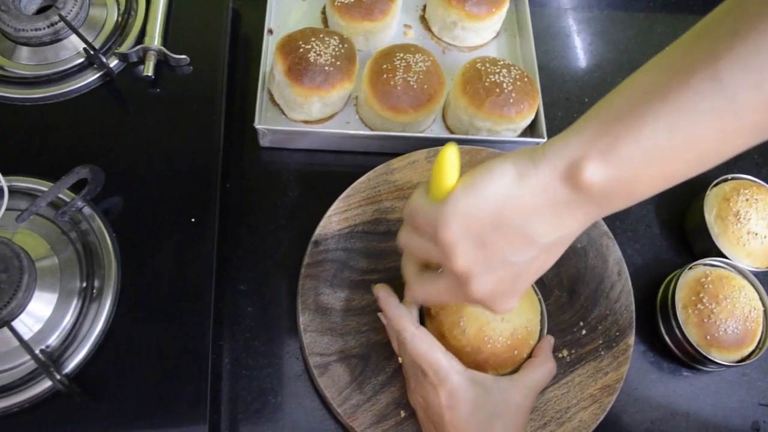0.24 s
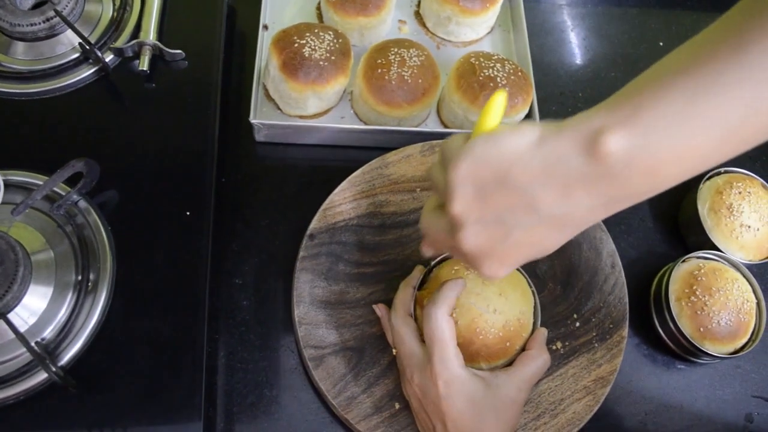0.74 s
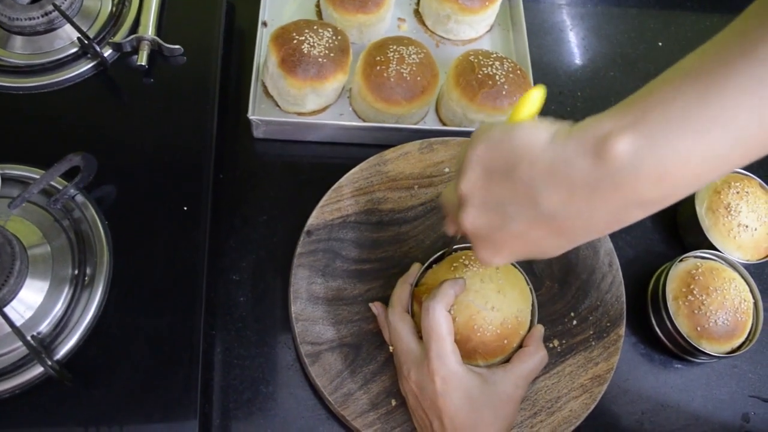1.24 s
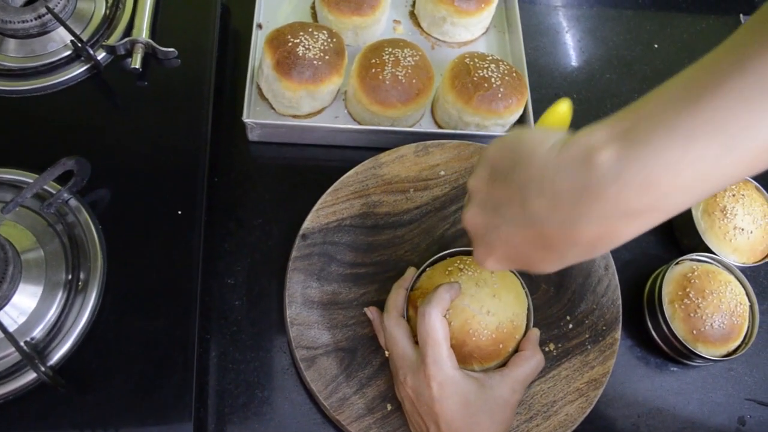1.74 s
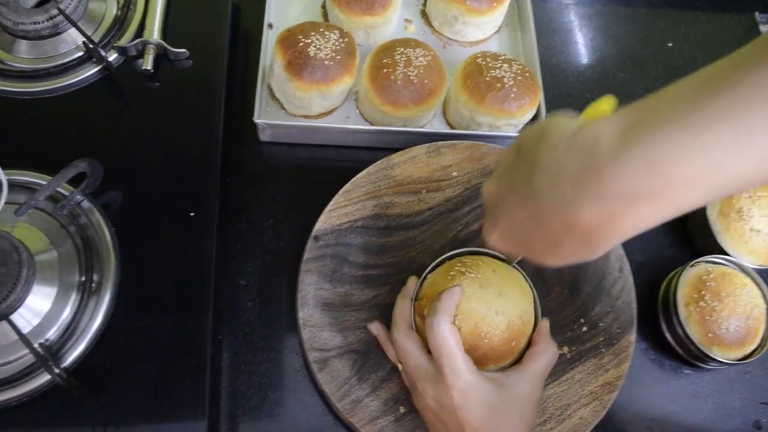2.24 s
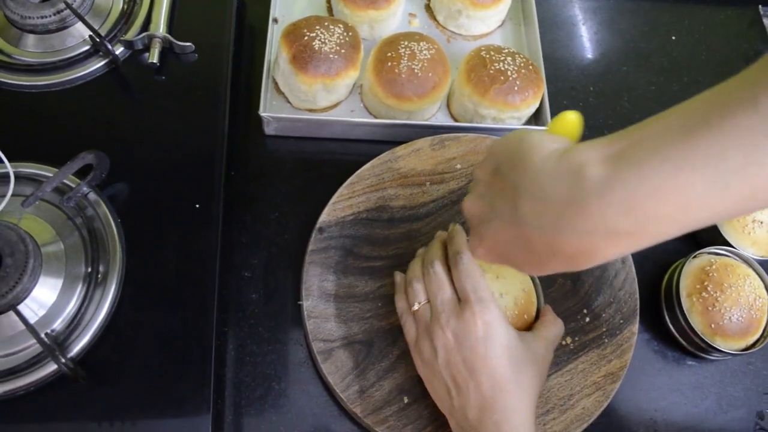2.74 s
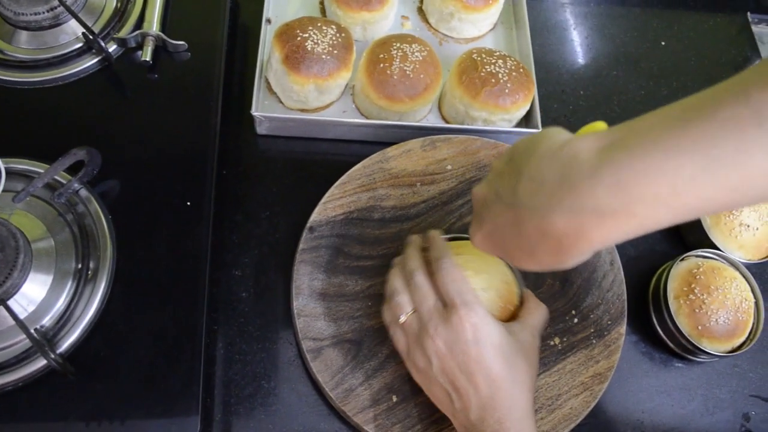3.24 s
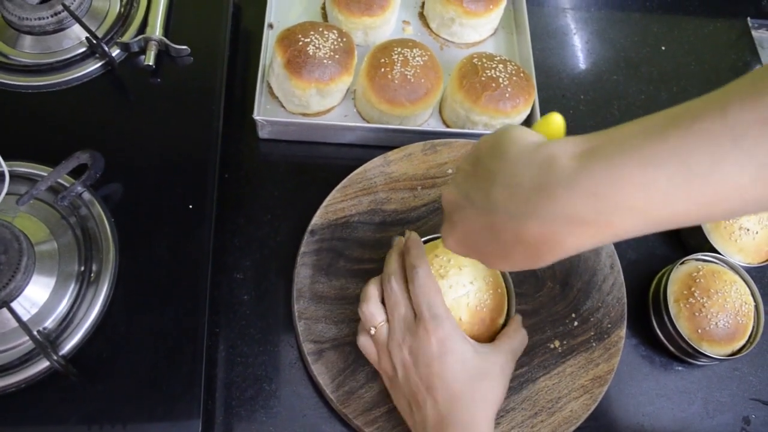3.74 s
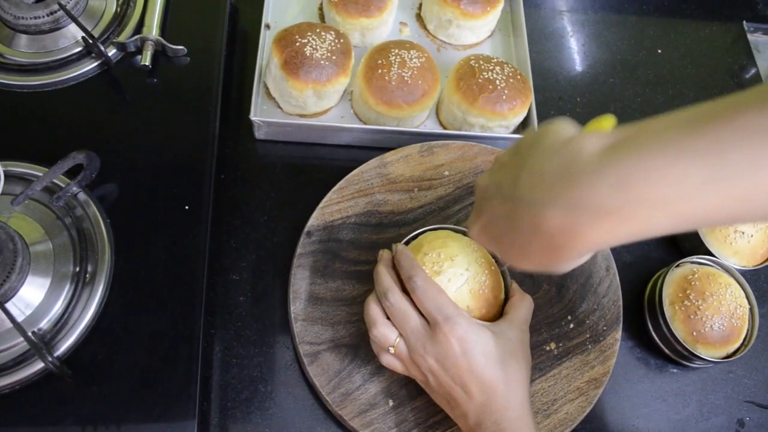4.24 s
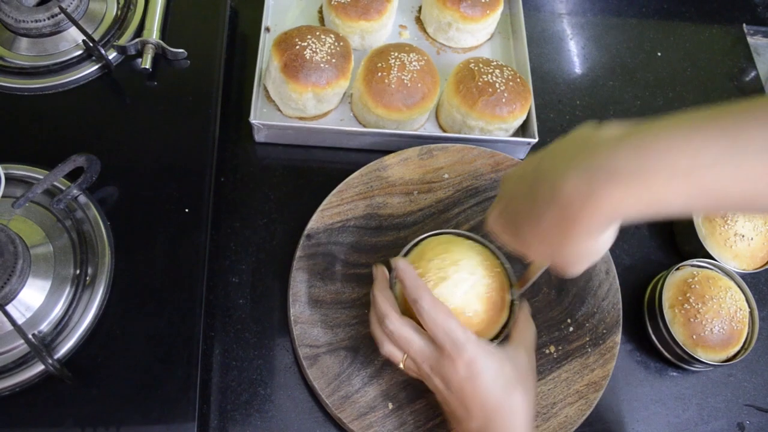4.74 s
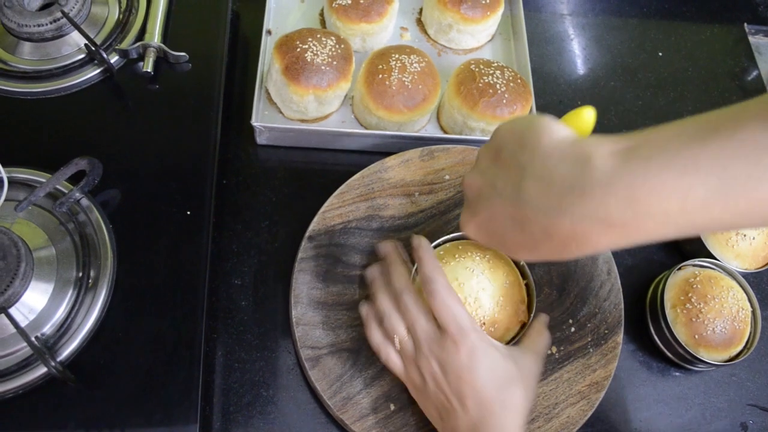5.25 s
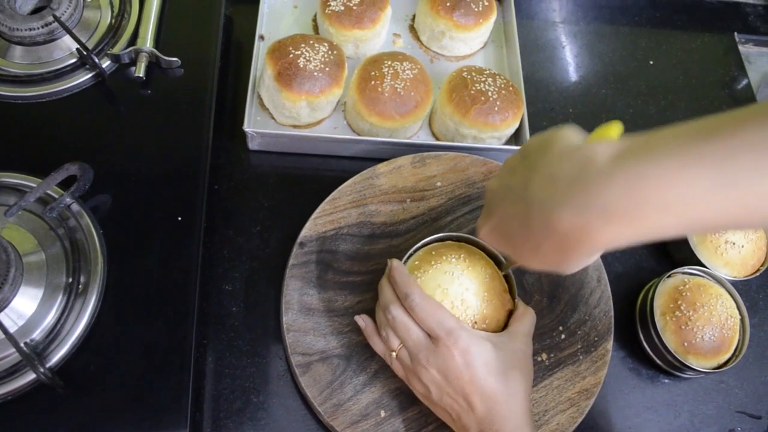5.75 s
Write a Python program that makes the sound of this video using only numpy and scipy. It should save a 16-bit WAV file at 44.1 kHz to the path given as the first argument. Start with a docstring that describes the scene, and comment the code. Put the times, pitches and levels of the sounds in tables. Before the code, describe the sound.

Short dry blade rasps and crust hisses lead into hollow tinny knocks, each with a sharp click, a damped ring and a brief rattle. They come in uneven up-and-down strokes, with gaps around 2.5 to 3.1 and 4.9 to 5.5 seconds. Close microphone, small hard room, low counter thuds under some hits, quiet street rumble.

```python
"""A knife is worked up and down round a bun in a small steel tin on a wooden board, in a hard kitchen.
Its tip knocks on the bottom: short pushes ring the modes of tin and board, and a rattle follows.
Its blade drags the tin, hisses on the crust and sings on the rim: uneven noise, filtered or on a carrier.
A noise tail answers as the room and low booms swell with some knocks. Underneath lie distant street
noise, a wavering low hum and one thin whistle."""
import sys
import numpy as np
from scipy import signal
from scipy.fft import rfft, irfft, next_fast_len
from scipy.io import wavfile
from scipy.ndimage import map_coordinates

SR = 44100
rng = np.random.default_rng(int(sys.argv[2]) if len(sys.argv) > 2 else 0)


def store_wav(level_fs):
    """Save 16-bit WAV to argv[1]."""
    pcm = np.round(np.clip(np.atleast_2d(level_fs), -1, 1) * 32767)
    wavfile.write(sys.argv[1], SR, pcm.T.astype(np.int16))


def boost_factor(decibels):
    """Convert a level in decibels to a linear amplitude factor."""
    exponent = np.asarray(decibels, float) / 20
    return 10 ** exponent


N = 264159  # length in samples


def unit(x):
    """Scaled to rms 1."""
    return x / np.sqrt(np.mean(x ** 2) + 1e-20)


def along(points, hz):
    """Reads (Hz, value) points on a log frequency axis."""
    f, value = np.transpose(points)
    return np.interp(np.log(hz + 1), np.log(f + 1), value)


def over_time(points):
    """Reads (s, value) points at every sample."""
    s, value = np.transpose(points)
    return np.interp(np.arange(N) / SR, s, value)


def wobble(rate):
    """A smooth random curve, rate knots a second."""
    knots = rng.standard_normal(int(N * rate / SR) + 4)
    return map_coordinates(knots, [np.arange(N) * rate / SR])


def filtered(x, response):
    """x times a complex response of frequency."""
    n = x.shape[-1]
    m = next_fast_len(n + SR // 4)
    return irfft(rfft(x, m) * response(np.fft.rfftfreq(m, 1 / SR)), m)[..., :n]


def modes(table):
    """Causal response of a set of resonances, each (Hz, width Hz, dB)."""
    return lambda f: sum(boost_factor(db) * 1j * f * w / (c * c - f * f + 1j * f * w) for c, w, db in table)


def grit(rate, depth_db):
    """Stick-slip force: noise that comes in uneven catches."""
    return unit(rng.standard_normal(N) * boost_factor(depth_db * wobble(rate)))


def tin(force, table, reach=1.2):
    """A force rings some modes; so small a body radiates no bass, and the bun damps all above the modes."""
    top = reach * table[-1][0]

    def response(f):
        bass_cut = (1j * f / (380 + 1j * f)) ** 4
        treble_cut = 1 / (1 + 1.1j * f / top - (f / top) ** 2) ** 5
        return modes(table)(f) * bass_cut * treble_cut
    return filtered(force, response)


# Knocks of the tip. Each row: time in seconds, peak of the lowest modes in dB, then against that peak
# the upper modes in dB, the top modes in dB and the board in dB.
TIP_KNOCKS = [(0.836, -33.5, 7.5, -7.5, -9.5), (1.138, -37.5, 3.5, -8, -10), (1.449, -36.5, 0, -13, -22),
              (1.488, -22, -1, -36, -23), (1.741, -44, 0, -19, -25), (1.786, -29.5, 3, -30, -13),
              (2.052, -53, 14.5, -21, -27), (2.102, -27.5, -2, -37, -18), (2.124, -17.5, -3, -32, -8.5),
              (2.413, -46, 3.5, -41, -23), (2.458, -44, -12, -49, -28), (3.167, -47.5, 6.5, -20, -17),
              (3.2, -33.5, -1, -14.5, -16), (3.228, -9.5, 3.5, -11, -25), (3.517, -15, 1.5, -19.5, -5),
              (4.047, -17.5, 2.5, -28.5, -43), (4.353, -15, 3.5, -23.5, -50), (4.657, -17, 2.5, -20, -22),
              (5.654, -48.5, 15, -24, 1), (5.929, -26, 4.5, -8.5, 3)]
# Modes of the hand-held tin, lowest first. Each row: centre in Hz, width in Hz, strength in dB.
TIN_MODES = [(717.5, 43.4, 26.5), (784, 110, 14), (1050, 30, -18), (1270.3, 81, 24), (1407, 580, 5),
             (1780, 71, -11.5), (2280, 250, 11), (2580, 330, 5.5), (3087, 50, -1)]
LOWEST, UPPER, TOP = TIN_MODES[:2], TIN_MODES[2:6], TIN_MODES[6:]
# Modes of the board under it. Each row: centre in Hz, width in Hz, strength in dB.
BOARD_MODES = [(383, 11, 1), (554.7, 95, 13.5)]
# Contact time scale of the tip in seconds, for the lowest, upper and top modes and the board.
TIP_CONTACT_S = (0.0004, 0.00023, 0.0026, 0.00036)
# The grip shifts between knocks: spread of each mode's pitch (share) and strength (dB).
GRIP_DETUNE, GRIP_DB = 0.012, 2
# Steel click: level offset in dB, dB of click per dB of top modes, 60 dB decay in seconds.
CLICK_DB, CLICK_FOLLOWS, CLICK_T60_S = -31, 0.54, 0.026


def knocks():
    """Soft pushes on tin and board, held a little differently each time, each with a sharp steel click."""
    out, click = np.zeros((2, N + SR))
    t = np.arange(SR // 8) / SR
    for s, db, upper_db, top_db, board_db in TIP_KNOCKS:
        at = round((s - 0.001) * SR)
        span = slice(at, at + len(t))
        click_db = CLICK_DB + CLICK_FOLLOWS * (db + top_db)
        click[span] += boost_factor(click_db - 60 * t / CLICK_T60_S) * rng.standard_normal(len(t))
        parts = [(0, LOWEST), (upper_db, UPPER), (top_db, TOP), (board_db, BOARD_MODES)]
        for (level_db, table), contact_s in zip(parts, TIP_CONTACT_S):
            held = [(hz * (1 + GRIP_DETUNE * rng.normal()), width, strength + GRIP_DB * rng.normal())
                    for hz, width, strength in table]
            u = t / contact_s
            push = u * np.exp(-u * u)
            if table is TOP:  # the top modes rattle through their contact
                ring = tin(push * rng.standard_normal(len(t)), held, reach=0.98)
            else:
                ring = tin(push, held)
            out[span] += boost_factor(db + level_db) * ring / np.abs(ring).max()
    # the click has the colour of the crust hiss, with an added band of steel
    steel = lambda f: boost_factor(along(CRUST_COLOUR, f)) + 0.89 * (f > 3200) * (f < 7000)
    return out[:N] + filtered(click[:N], steel)


# Broad colour of the tin shuddering on the board. Each row: centre in Hz, width in Hz, strength in dB.
SHUDDER_MODES = [(554, 380, 2.5), (941, 600, 8.5), (1440, 240, -0.5), (1706, 270, -3)]
# Levels in dB against the knock's lowest modes; each part's own knock level is added.
SHUDDER_LOW_DB, SHUDDER_TOP_DB = -26.5, -30
# It rises and sags throughout; after the hold a 60 dB decay in T60 is added to the sag.
SHUDDER_RISE_S, SHUDDER_HOLD_S, SHUDDER_T60_S, SHUDDER_SAG_DB_PER_S = 0.0012, 0.065, 0.1, 94.5


def shudder():
    """A rough broad rattle holds for a moment after each knock; the top modes rattle on for longer."""
    low, top = np.zeros((2, N + SR))
    t = np.arange(SR // 3) / SR

    def shape(lasts):
        slow_t = t / lasts  # stretches hold, sag and decay, not the rise
        decay_db = 60 * np.clip(slow_t - SHUDDER_HOLD_S, 0, None) / SHUDDER_T60_S
        return (1 - np.exp(-t / SHUDDER_RISE_S)) * boost_factor(-decay_db - SHUDDER_SAG_DB_PER_S * slow_t)
    for s, db, upper_db, top_db, _ in TIP_KNOCKS:
        at = round(s * SR)
        span = slice(at, at + len(t))
        low[span] += boost_factor(db + SHUDDER_LOW_DB + upper_db) * shape(1)
        top[span] += boost_factor(db + SHUDDER_TOP_DB + top_db) * shape(1.6)
    low_rattle = unit(tin(grit(90, depth_db=3.5), SHUDDER_MODES))
    top_band = lambda f: (f > 1400) / (1 + (f / TIN_MODES[-1][0]) ** 60)
    top_rattle = unit(filtered(grit(90, depth_db=2), top_band))
    return low[:N] * low_rattle + top[:N] * top_rattle


def stroke(start, length, rise, bend):
    """First sample and pressure shape: a downward stroke builds to its knock, a free one bites early."""
    hits = np.array([k[0] for k in TIP_KNOCKS])
    # downward if a knock falls after 0.3 of the stroke and at most 12 ms past its end
    downward = np.any((hits > start + 0.3 * length) & (hits < start + length + 0.012))
    share = rise[0] if downward else rise[1]
    u = np.arange(round(length * SR)) / (length * SR)
    up, down = np.clip([u / share, (1 - u) / (1 - share)], 0, 1)
    return round(start * SR), up ** bend * down ** 0.87


# The blade drags the tin. Each row: start in seconds, length in seconds, lowest modes in dB, upper modes # in
# dB, both before the pressure shape. The row at 3.34 s is no drag: it is the tin still ringing on # after the
# hard knock at 3.228 s.
WALL_DRAGS = [(0.001, 0.2, -67, -54), (0.197, 0.28, -66, -53.5), (0.776, 0.065, -50.5, -50.5),
              (1.091, 0.092, -40.5, -42.5), (1.306, 0.062, -55, -69), (1.398, 0.085, -45, -44.5),
              (1.708, 0.0784, -39.5, -35), (1.793, 0.022, -36, -28), (1.942, 0.097, -59.5, -58),
              (2.026, 0.097, -39, -35.5), (2.403, 0.048, -66, -45.5), (3.154, 0.092, -37.5, -36.5),
              (3.34, 0.178, -49.5, -52), (3.966, 0.13, -50.5, -53.5), (4.255, 0.093, -47, -43.5),
              (4.535, 0.13, -48.5, -50), (5.626, 0.03, -46, -34), (5.74, 0.054, -78, -55),
              (5.859, 0.07, -45, -47)]
DRAG_RISE = (0.9, 0.34)  # share of a stroke spent building up: downward, free


def drags():
    """The blade judders against the wall and shakes the tin's modes, which its pressure damps."""
    low, high = np.zeros((2, N))
    for start, length, low_db, high_db in WALL_DRAGS:
        at, shape = stroke(start, length, DRAG_RISE, bend=1.34)
        low[at:][:len(shape)] += boost_factor(low_db) * shape
        high[at:][:len(shape)] += boost_factor(high_db) * shape
    damped = [(hz, 1.3 * width, db) for hz, width, db in TIN_MODES]
    low_judder = unit(tin(grit(70, depth_db=2.5), damped[:2]))
    high_judder = unit(tin(grit(70, depth_db=4.5), damped[2:4]))
    return low * low_judder + high * high_judder


# The blade slides. Each row: start in seconds, length in seconds, crust hiss in dB, rim in dB, rim pitch
# in Hz; levels before the pressure shape.
BLADE_SLIDES = [(0.001, 0.12, -69.5, -48.5, 2787), (0.07, 0.081, -71, -47, 2720),
                (0.224, 0.22, -72, -49, 2100), (0.285, 0.14, -92, -56, 3260), (0.56, 0.045, -82, -73, 2610),
                (0.742, 0.14, -70, -56, 3050), (0.991, 0.11, -79, -63.5, 3070),
                (1.081, 0.11, -65.5, -46, 2680), (1.309, 0.054, -63.5, -57, 2640),
                (1.407, 0.098, -64.5, -54, 3150), (1.595, 0.069, -60, -59.5, 2716),
                (1.631, 0.08, -65.5, -48, 3160), (1.696, 0.13, -60.5, -48.5, 2430),
                (1.918, 0.12, -67.5, -50.5, 2643), (2.053, 0.098, -64.5, -57.5, 2490),
                (2.258, 0.082, -76.5, -71, 2630), (2.366, 0.092, -80, -70, 3170),
                (3.176, 0.065, -63.5, -59, 2842), (3.332, 0.081, -77, -65, 2690),
                (3.443, 0.14, -68, -61, 2250), (3.915, 0.042, -75, -72.5, 2165),
                (4.274, 0.087, -64.5, -60, 3430), (4.473, 0.032, -74, -68, 2160),
                (4.504, 0.13, -66, -63, 2230), (4.539, 0.046, -74, -56, 2185), (4.6, 0.067, -69, -57, 2140),
                (4.766, 0.1, -71.5, -63.5, 2206), (5.524, 0.068, -60.5, -64.5, 2316),
                (5.621, 0.034, -66.5, -66, 2583), (5.742, 0.11, -67.5, -61.5, 2239),
                (5.873, 0.11, -62.5, -50, 2126)]
# Colour of the crust hiss. Each row: frequency in Hz, relative level in dB per Hz.
CRUST_COLOUR = [(2500, -41), (4000, -1), (5300, -6), (6500, -5), (8000, 1), (10000, 4.5), (11200, 1),
                (12200, -4.5), (14000, -17.5), (15700, -20)]
# The blade's overtone: multiple of the rim pitch, noise corner in Hz, noise level in dB over the hiss
# before it meets the carrier.
BLADE_OVERTONE = (2.02, 300, -6)
SLIDE_RISE = (0.57, 0.27)  # share of a stroke spent building up: downward, free


def slide():
    """Fine crust hiss, a rasp on the rim, and a resonance set by the free blade length in each stroke."""
    hiss = unit(filtered(grit(120, depth_db=2.5), lambda f: boost_factor(along(CRUST_COLOUR, f))))
    narrow = unit(filtered(grit(64, depth_db=2.0), lambda f: 1 / (1 + 1j * f / 180) ** 2))
    catches = grit(120, depth_db=4)
    # rim resonances: (Hz, width Hz, dB)
    rasp = unit(tin(catches, [(1950, 910, 12.0), (2690, 430, 5.5), (3580, 240, -5.0), (4070, 190, -4.0)]))
    multiple, corner_hz, over_db = BLADE_OVERTONE
    broad = unit(filtered(catches, lambda f: 1 / (1 + 1j * f / corner_hz) ** 2))
    out = np.zeros(N)
    for start, length, hiss_db, rim_db, rim_hz in BLADE_SLIDES:
        at, shape = stroke(start, length, SLIDE_RISE, bend=0.8)
        span = slice(at, at + len(shape))
        phase = 2 * np.pi * rim_hz * np.arange(len(shape)) / SR
        # low noise carried on the stroke's pitch and on its overtone
        song = narrow[span] * np.sin(phase)
        edge = boost_factor(over_db) * broad[span] * np.sin(multiple * phase)
        crust = boost_factor(hiss_db) * (hiss[span] + edge)
        rim = boost_factor(rim_db) * (0.63 * song + 0.37 * rasp[span])
        out[span] += shape * (crust + rim)
    return out


# Decay of the room. Each row: frequency in Hz, 60 dB decay time in seconds.
KITCHEN_DECAY = [(200, 0.25), (700, 0.39), (1400, 0.31), (2800, 0.24), (5000, 0.2), (10000, 0.19)]


def kitchen(x):
    """The room's tail is decaying noise, drawn anew for every third of a second and 260 samples late."""
    wet, step = np.zeros(N + 2 * SR), SR // 3
    for at in range(0, N, step):
        hz, t, z = signal.stft(rng.standard_normal(SR // 2), SR, nperseg=256)
        decay = boost_factor(-60 * t / along(KITCHEN_DECAY, hz)[:, None])
        tail = signal.istft(z * decay, SR, nperseg=256)[1]
        part = signal.fftconvolve(x[at:at + step], tail / np.linalg.norm(tail))
        wet[at + 260:][:len(part)] += part
    return wet[:N]


# Booms of the counter. Each row: start in seconds, peak of the swell in dB.
COUNTER_BOOMS = [(2.123, -60), (3.23, -56), (3.52, -61.5), (4.353, -58.5), (4.658, -56.5), (5.931, -55.5)]


def counter():
    """A low 124 Hz boom swells for 26 ms after a blow, then dies away."""
    t, out = np.arange(N) / SR, np.zeros(N)
    for s, db in COUNTER_BOOMS:
        u = np.clip(t - s, 0, None) / 0.026
        out += boost_factor(db) * u * np.exp(1 - u) * np.sin(2 * np.pi * 124 * (t - s))
    return out


# Colour of the street noise. Each row: frequency in Hz, relative level in dB per Hz.
STREET_COLOUR = [(20, -13.5), (60, -8.5), (130, -5), (175, -2.5), (250, -0.5), (600, -2.5), (1500, -10.5),
                 (3000, -23.5), (4600, -33), (7000, -38.5), (13000, -44)]
# Street level, before a lift and a waver. Each row: time in seconds, level in dB.
STREET_FADER = [(0.0, -66.5), (4.72, -67), (5.99, -64)]
# Hum level, before its waver. Each row: time in seconds, peak in dB.
HUM_FADER = [(0.0, -74.5), (2.3, -75), (2.8, -81)]
# The faint thin whistle: start in seconds, end in seconds, pitch in Hz, peak in dB.
THIN_WHISTLE = (3.63, 3.86, 6880, -88)


def background():
    """Unsteady coloured noise far off, a sine hum wavering round 128 Hz, and one thin sine whistle."""
    t = np.arange(N) / SR
    noise = unit(filtered(rng.standard_normal(N), lambda f: boost_factor(along(STREET_COLOUR, f))))
    street = boost_factor(over_time(STREET_FADER) + 2 + 1.9 * wobble(8.3)) * noise
    hum_hz = 128 + 8 * wobble(0.39)
    hum = boost_factor(over_time(HUM_FADER) + 3.5 * wobble(3.2)) * np.sin(2 * np.pi * np.cumsum(hum_hz) / SR)
    start, end, hz, db = THIN_WHISTLE
    swell = np.sqrt(np.abs(np.sin(np.pi * np.clip((t - start) / (end - start), 0, 1))))
    whistle = boost_factor(db) * swell * np.sin(2 * np.pi * hz * t)
    return street + hum + whistle


def scene():
    """Knife and tin close by, the room and the street behind."""
    knife = knocks() + shudder() + drags() + slide()
    room = boost_factor(-7) * kitchen(knife)
    return (knife + room + counter() + background())[None]


def roll_off(x):
    """The treble ends steeply here."""
    return signal.sosfilt(signal.butter(12, 15720, fs=SR, output="sos"), x)


def record(dry):
    """Delivers the finished mix."""
    return roll_off(dry)


dry = scene()
out = record(dry)
store_wav(out)
```